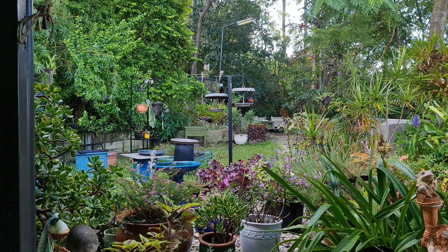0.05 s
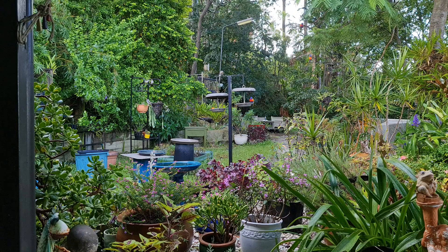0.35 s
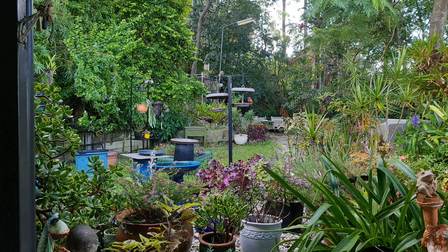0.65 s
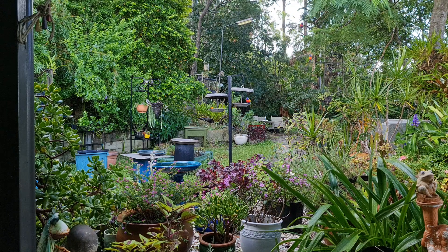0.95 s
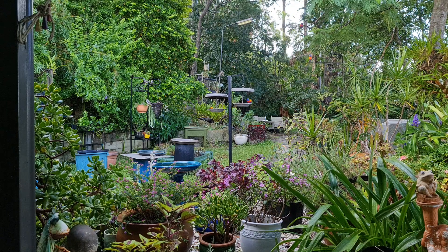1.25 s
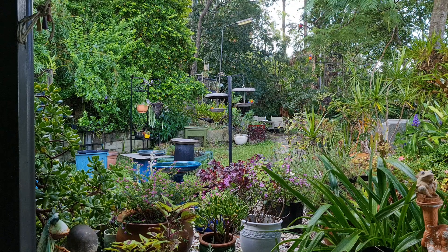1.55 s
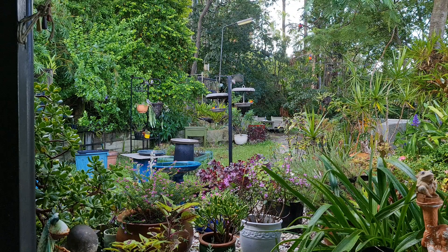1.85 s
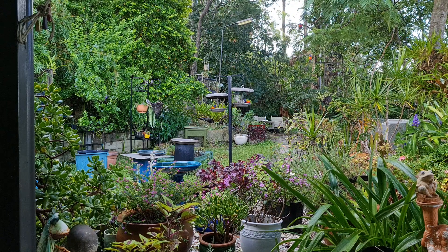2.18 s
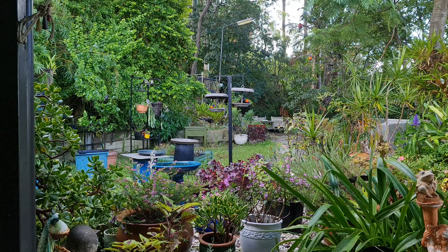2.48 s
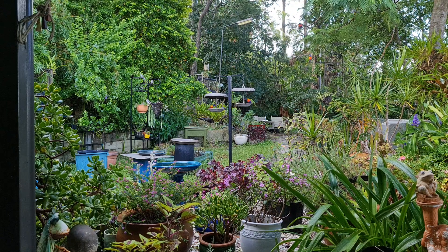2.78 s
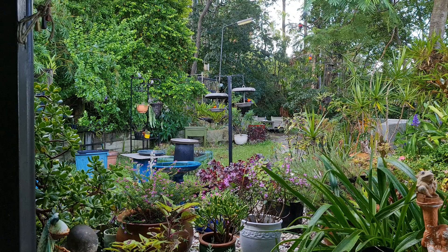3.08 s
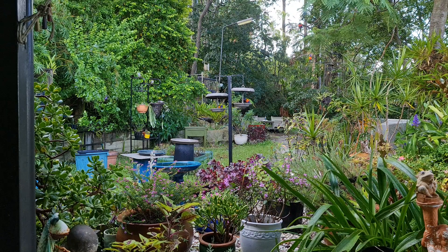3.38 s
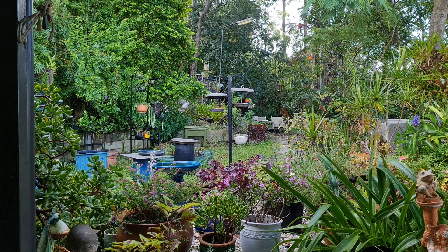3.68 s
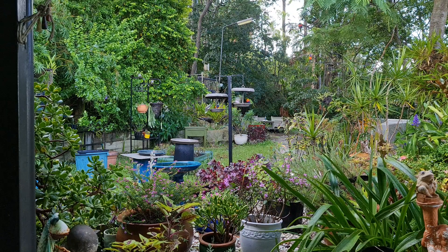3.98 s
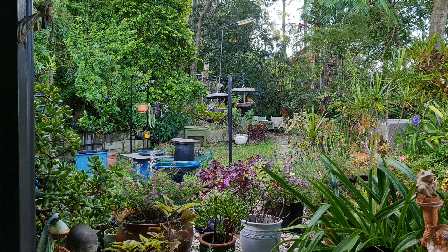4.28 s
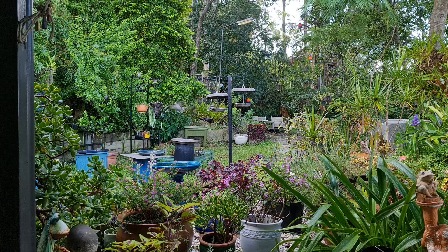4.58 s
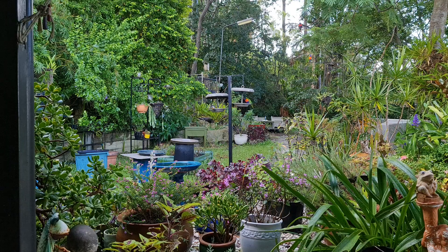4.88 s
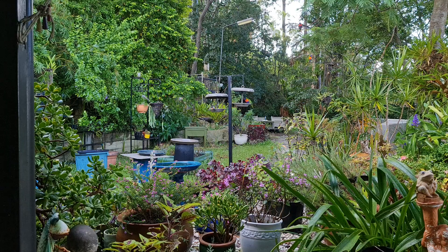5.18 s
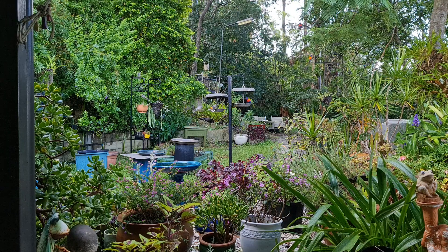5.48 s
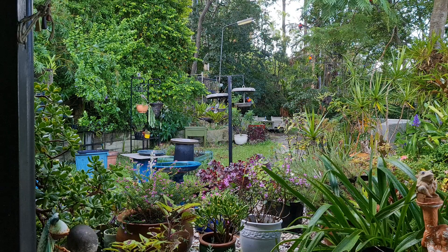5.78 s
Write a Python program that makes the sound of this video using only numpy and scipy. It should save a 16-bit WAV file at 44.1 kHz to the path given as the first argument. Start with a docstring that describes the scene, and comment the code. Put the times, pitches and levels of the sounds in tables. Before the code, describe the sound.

A parrot squawks harshly several times in a leafy garden, among small bird whistles, hoarse chatter and ticking twigs.

```python
"""Slurred whistles and hoarse bird chatter in a leafy back garden, over a low, distant rumble.
A parrot gives five harsh squawks in a row and a last loud one; its voice box flaps unevenly, so it rasps.
Twigs and leaves tick and rustle, something knocks softly, and a far crow caws once with a nasal buzz.
Nearby walls and the trees scatter every call."""
import sys
import numpy as np
from scipy import signal
from scipy.fft import rfft, irfft, next_fast_len
from scipy.io import wavfile

SR = 44100
rng = np.random.default_rng(int(sys.argv[2]) if len(sys.argv) > 2 else 0)


def int16_out(signal):
    """Quantize to a 16-bit WAV file."""
    q = np.round(np.clip(np.atleast_2d(signal).T, -1, 1) * 32767)
    wavfile.write(sys.argv[1], SR, q.astype(np.int16))


N = 266364


def from_db(db):
    """Turn decibels into a factor to multiply by."""
    return 10 ** (np.asarray(db) / 20)


def rms_one(x):
    """Scale a sound so that its average strength (rms) is 1."""
    return x / np.sqrt(np.mean(x ** 2) + 1e-20)


def at_hz(points, hz):
    """Read between the points of a curve, with frequency spaced in octaves."""
    knots, values = np.transpose(points)
    return np.interp(np.log(np.maximum(hz, 1)), np.log(knots), values)


def coloured(x, spectrum):
    """Make some frequencies louder and others softer, as a throat does."""
    size = next_fast_len(2 * len(x))
    gain = from_db(at_hz(spectrum, np.fft.rfftfreq(size, 1 / SR)))
    return irfft(rfft(x, size) * gain, size)[:len(x)]


def filtered(x, kind, hz, order=2):
    """Keep the "low" part, the "high" part or one "band" of a sound."""
    return signal.sosfilt(signal.butter(order, hz, kind, fs=SR, output="sos"), x)


def wander(size, rate_hz):
    """A smooth random wobble, about 1 in size."""
    return rms_one(filtered(rng.standard_normal(SR), "low", rate_hz))[-size:]


def clock(length_s):
    """Time through a sound: t in seconds, and u running from 0 to 1."""
    t = np.arange(int(length_s * SR)) / SR
    return t, t / length_s


def arch(u):
    """0 at both ends of a sound, 1 in its middle."""
    return 1 - (2 * u - 1) ** 2


def glide(u, start_hz, middle_hz, end_hz):
    """A smooth slide through three pitches."""
    return start_hz + (end_hz - start_hz) * u + (middle_hz - (start_hz + end_hz) / 2) * arch(u)


def harmonics(pitch, count):
    """Pure tones at 1, 2, 3... times a moving pitch, one in each row."""
    k = np.arange(1, count + 1)[:, None]
    return np.sqrt(2) * np.sin(2 * np.pi * k * np.cumsum(pitch) / SR) * (k * pitch < SR / 2)


def add(track, start_s, sound, fade_s=0.0017):
    """Lay a sound into a track, fading it in and out."""
    at, i = round(start_s * SR), np.arange(len(sound))
    sound = sound * np.minimum(1, np.minimum(i, i[::-1]) / (fade_s * SR))
    track[at:at + len(sound)] += sound[:N - at]


def air(level_db=-49):
    """A steady distant rumble, alike in both ears, and a hiss that differs between them."""
    # tone colour of the noise: f/Hz, level/dB
    spectrum = [(20, -29), (45, -6), (92, 0.5), (170, -4), (260, -11.5), (400, -13), (750, -15),
                (1500, -19.5), (3000, -19), (6500, -19.5), (9500, -30), (13000, -26.5), (16000, -26.5)]
    # how alike left and right are: f/Hz, likeness (1 = the same)
    likeness = [(30, 1), (120, 0.96), (250, 0.85), (500, 0.54), (1000, 0.011), (16000, 0.036)]
    hz = np.fft.rfftfreq(N, 1 / SR)
    shared, opposite = rfft(rng.standard_normal((2, N))) * from_db(at_hz(spectrum, hz))
    alike = np.clip(at_hz(likeness, hz), 0, 1)
    stereo = np.sqrt(1 + alike) * shared + np.sqrt(1 - alike) * opposite * [[1], [-1]]
    return from_db(level_db) * rms_one(irfft(stereo, N))


def leaves(per_s=30, level_db=-38, spread_db=4, low_hz=7000):
    """Leaves give tiny, high ticks at random moments."""
    hits = rng.random(N) < per_s / SR
    strength = from_db(level_db + spread_db * np.clip(rng.standard_normal(N), -2, 1.6))
    return filtered(hits * strength + 1e-18, "high", low_hz)


def whistles(scoop_s=.013, waver=.0035, accent_width_s=0.02, flutter_db=2.0, flicker_db=5.5):
    """Birds whistle sliding, fluttering notes, each with one louder moment (its accent)."""
    # notes: t/s, length/s, start f/Hz, middle f/Hz, end f/Hz, scoop (share of the pitch it starts below),
    # level/dB, octave above that level/dB, accent time into the note/s, accent/dB
    notes = [ (.118, 0.089, 2283, 2346, 1860, 0.11, -59, -0.5, 0.051, 5.5),
             (1.303, 0.071, 1616, 1404, 1266, 0.01, -56.5, 4, 0.065, 5.6),
             (1.456, .159, 3057, 2605, 2027, 0.02, -46, -13.5, 0.018, 11.4),
             (1.645, .075, 1193, 1260, 1290, 0.19, -66, -1, .035, 2),
             (1.696, .074, 3188, 3197, 3143, .22, -51, 9.5, 0.056, 12.2),
             (1.768, 0.055, 3213, 3350, 3160, 0.015, -45.5, 0, 0.0042, 6.6),
             (5.09, 0.097, 4200, 4150, 4330, 0.022, -68, -17, .05, 5)]
    out = np.zeros(N)
    for start_s, length_s, *path_hz, scoop, level_db, octave_db, accent_s, accent_db in notes:
        t, u = clock(length_s)
        pitch = glide(u, *path_hz) * (1 - scoop * np.exp(-t / scoop_s))
        levels = from_db([0, octave_db, -20, max(octave_db, 0) - 21, -23])
        # only the top three harmonics flicker
        flicker = from_db([flicker_db * (k > 1) * wander(len(t), 100) for k in range(5)])
        pitch *= 1 + waver * wander(len(t), 450)
        tone = levels @ (flicker * harmonics(pitch, count=5))
        push_db = accent_db * np.exp(-((t - accent_s) / accent_width_s) ** 2)
        loudness = from_db(level_db + push_db + flutter_db * wander(len(t), 120))
        add(out, start_s, tone * loudness, fade_s=0.0033)
    return out


def rustles(per_s=2500, spread_db=4, low_hz=5000):
    """Leaves brush together in a dense run of tiny clicks that swells and fades."""
    # brief rustles: t/s, length/s, level/dB
    brushes = [(0.137, 0.074, -54), (1.94, 0.21, -62.5), (3.578, 0.25, -58.5), (4.231, 0.12, -57),
               (5.91, 0.1, -54.5)]
    out = np.zeros(N)
    for start_s, length_s, level_db in brushes:
        t, u = clock(length_s)
        clicks = (rng.random(SR) < per_s / SR) * rng.choice([-1, 1], SR)
        strength = from_db(spread_db * np.clip(rng.standard_normal(SR), -2, 2))
        crackle = rms_one(filtered(clicks * strength + 1e-18, "high", low_hz))
        add(out, start_s, from_db(level_db) * arch(u) * crackle[:len(t)])
    return out


def chatter(jitter=0.0292, jitter_hz=250, octave_db=-14, pitch_lift=.02, swell_db=2):
    """Birds in the trees give shrill notes, made hoarse by a fast shake (jitter) in pitch."""
    # notes: t/s, length/s, start f/Hz, end f/Hz, level/dB, hoarseness (1 = usual)
    notes = [ (.17, .13, 1930, 1620, -65, 1.5), (0.689, .12, 2746, 3256, -58, 1.46),
             (.76, 0.12, 3500, 3500, -50, 1.6), (.72, 0.11, 1573, 1576, -68.5, .6),
             (0.819, .13, 4160, 4170, -57.5, 1.17), (.85, .2, 3210, 3216, -56, 1.83),
             (.87, .22, 6290, 6170, -59, 1.03), (1.089, .21, 4220, 3890, -62.5, 1.2),
             (3.55, 0.13, 2515, 2150, -64, 3.7), (3.562, 0.27, 3450, 3400, -57.5, 4.4),
             (3.65, 0.13, 4630, 4490, -55.5, 1.54), (5.3, 0.21, 2740, 2480, -70, 2.1),
             (5.86, 0.16, 4490, 4650, -59, 1.7), (5.88, 0.14, 3016, 3150, -58.5, 1.38)]
    out = np.zeros(N)
    for start_s, length_s, start_hz, end_hz, level_db, hoarse in notes:
        t, u = clock(length_s)
        pitch = (start_hz + (end_hz - start_hz) * u) * (1 + pitch_lift * arch(u))
        pitch *= 1 + hoarse * jitter * wander(len(t), jitter_hz)
        first, octave = harmonics(pitch, count=2)
        loudness = from_db(level_db - swell_db * (2 - arch(u)))
        add(out, start_s, loudness * (first + from_db(octave_db) * octave), fade_s=0.0066)
    return out


def twigs(crack_decay_s=0.007, rustle_decay_s=0.083, rustle_db=-8, octaves=0.36):
    """Twigs and leaves snap: a bright crack, then a short rustle around its own pitch."""
    # snaps: t/s, level/dB, centre of the rustle f/Hz, crack above that level/dB
    snaps = [(.3263, -44, 6600, 4), (0.433, -47, 5100, 3), (0.7587, -39.5, 4100, 8.5), (.857, -43, 3080, 7),
             (0.9875, -48, 3330, 13.5), (1.082, -47.5, 3180, 8.5), (1.1684, -42.5, 3370, -1),
             (1.338, -40.5, 2690, 1), (1.9019, -38.5, 11500, 13), (2.0644, -34, 3600, -2),
             (2.2002, -37.5, 4070, -2.5), (3.2214, -36.5, 4430, 0.5), (3.5473, -36.5, 14000, -3),
             (4.4987, -40.5, 8400, 0), (4.6413, -36.5, 4120, -5), (4.698, -40, 13100, 4),
             (5.0933, -39.5, 14200, -0.5), (5.1667, -38.5, 6900, -1), (5.5737, -31, 5650, -8),
             (5.7214, -37, 3200, 1), (5.831, -41, 5100, -0.5)]
    out, t = np.zeros(N), np.arange(SR // 4) / SR
    for start_s, level_db, hz, crack_db in snaps:
        crack, rustle = rng.standard_normal((2, len(t)))
        edges_hz = np.clip([hz / 2 ** octaves, hz * 2 ** octaves], 100, SR / 2 - 1000)
        rustle = rms_one(filtered(rustle, "band", edges_hz))
        rustle *= from_db(rustle_db - 60 * t / rustle_decay_s)
        crack = rms_one(filtered(crack, "high", 6000))
        crack *= from_db(crack_db - 60 * t / crack_decay_s)
        add(out, start_s, from_db(level_db) * (crack + rustle), fade_s=0.00015)
    return out


def parrot(jitter=0.0208, jitter_hz=400, rasp_hz=112, rasp_spread=0.1657, rasp_db=3.0, rasp_bend=0.065,
           end_effort=0.29, pitch_sag=0.0407, attack_db=8.5, attack_s=0.009, scoop_s=0.022,
           harsh_s=0.015, hiss=0.13, smooth_third_db=18, low_follows=0.39):
    """The voice box flaps unevenly: each flap swells and bends the tone, making it a harsh squawk."""
    # squawks: t/s, length/s, top f/Hz, scoop (share of the pitch it starts below), upper tones level/dB,
    # first tone and octave above that level (each /dB), roughness (1 = full rasp), swell/dB,
    # crest (moment of most effort, as a share of the length)
    squawks = [ (1.905, 0.16, 1408, .09, -52.5, 0, 4.5, 2.2, -6, 0.63),
               (2.270, .150, 1445, .12, -27, -20, -12, 1.45, 11, 0.67),
               (2.519, 0.13, 1500, 0.1, -24.5, -21.5, -12, 1.13, 4.5, 0.69),
               (2.745, .150, 1429, .13, -23.5, -20.5, -13.5, 1.15, 5.5, 0.53),
               (2.990, .152, 1406, 0.1, -24, -21.5, -15, 1.04, 10, 0.67),
               (3.240, .160, 1408, .15, -27.5, -19.5, -11, 1.39, 5.5, 0.534),
               (3.792, 0.19, 1321, 0.0069, -41.5, -10.5, -8.5, 0.71, -1, 0.442),
               (4.043, .147, 1436, 0.048, -20.5, -18.5, -19.5, 0.95, 6, 0.803)]
    # how the throat and open bill colour the voice: f/Hz, level/dB
    throat = [(1000, -20), (2400, 0.5), (3450, -5), (3900, -2.5), (4500, 4), (4850, -2), (5300, 0.5),
              (5750, -9), (6400, -3.5), (6900, -14), (7400, -17), (10000, -19), (13000, -17.5),
              (16000, -35.5)]
    out = np.zeros(N)
    for start_s, length_s, top_hz, scoop, level_db, first_db, octave_db, rough, swell_db, crest in squawks:
        t, u = clock(length_s)
        size = len(t)
        # effort rises to the crest and eases off; slack is how far it falls short
        before = (1 - u / crest) ** 2
        after = (1 - end_effort) * ((u - crest) / (1 - crest)) ** 2
        slack = np.where(u < crest, before, after)
        drop_db = swell_db * slack + attack_db * np.exp(-(t / attack_s) ** 2)
        # a call slides up from a clean start and breaks into a rasp as pressure builds
        pitch = top_hz * (1 - pitch_sag * slack) * (1 - scoop * np.exp(-t / scoop_s))
        harsh = rough * (1 - np.exp(-t / harsh_s))
        flap = 2 * np.pi * np.cumsum(rasp_hz * (1 + rasp_spread * wander(size, 77.5))) / SR
        # each flap is loudest while its pitch sweeps down
        bend = jitter * wander(size, jitter_hz) + rasp_bend * np.cos(flap)
        tones = harmonics(pitch * (1 + harsh * bend), count=12)
        pulse = rms_one(from_db(rasp_db * harsh * np.sin(flap)))
        # a smooth call has a stronger third harmonic
        tones[2] *= from_db(smooth_third_db * max(0, 1 - rough))
        # the upper tones and a little breath ring in the throat
        breath = hiss * harsh * rng.standard_normal(SR)[:size]
        upper = rms_one(coloured(pulse * (rms_one(tones[2:].sum(0)) + breath), throat))
        # the two low tones skip the throat curve and follow only part of the level change
        lower = pulse * (from_db(first_db) * tones[0] + from_db(octave_db) * tones[1])
        lower = filtered(lower, "low", 3100, order=8)
        call = from_db(level_db - drop_db) * upper + from_db(level_db - low_follows * drop_db) * lower
        add(out, start_s, call, fade_s=0.00089)
    return out


def thud(start_s=2.535, length_s=.06, hz=250, level_db=-51):
    """A soft knock somewhere in the garden: a short burst of low noise."""
    out = np.zeros(N)
    body = filtered(rng.standard_normal(SR), "band", [hz / 1.2, hz * 1.24])
    add(out, start_s, from_db(level_db) * rms_one(body[-int(length_s * SR):]), fade_s=0.0074)
    return out


def crow(start_s=4.8, length_s=.308, end_db=-49.5, rise_db=4, jitter=0.007):
    """One far caw: a low buzz through a nasal throat, arching in pitch and growing louder."""
    # pitch of the caw: start f/Hz, middle f/Hz, end f/Hz
    path_hz = (213.7, 250, 225.8)
    # how the throat colours the buzz: f/Hz, level/dB
    throat = [(950, -17), (1220, -8.5), (1480, 2), (1750, -10), (2000, -0.5), (2300, -12), (2700, -41),
              (5000, -40)]
    out = np.zeros(N)
    t, u = clock(length_s)
    pitch = glide(u, *path_hz) * (1 + jitter * wander(len(t), 120))
    buzz = harmonics(pitch, count=16).sum(0)
    loudness = from_db(end_db - rise_db * (1 - u))
    add(out, start_s, loudness * rms_one(coloured(buzz, throat)), fade_s=0.014)
    return out


def garden(x, direct_db, walls_db, trees_db, lag_ms, pan_db=0, walls_decay_s=0.26, trees_decay_s=0.62):
    """Sound arrives directly, as quick echoes off nearby walls and as a long, duller tail off trees."""
    t = np.arange(SR) / SR
    walls, trees = rng.standard_normal((2, 2, SR)) * (1 - np.exp(-t / 0.00051))
    walls = rms_one(walls * from_db(-60 * t / walls_decay_s))
    trees = rms_one(filtered(trees, "low", 6500) * from_db(-60 * t / trees_decay_s))
    size = next_fast_len(N + SR)
    echoes = rfft(from_db(walls_db) * walls + from_db(trees_db) * trees, size) / np.sqrt(SR)
    # above zero, lag_ms makes the left ear later and pan_db makes it louder
    ears = np.array([[1], [-1]]) / 2
    delay = np.exp(-2j * np.pi * np.fft.rfftfreq(size, 1 / SR) * ears * lag_ms / 1000)
    paths = from_db(direct_db) * delay + echoes
    return from_db(pan_db * ears) * irfft(rfft(x, size) * paths, size)[:, :N]


def scene():
    """Place the birds and foliage around the garden, then add the knock and the air."""
    return (garden(parrot(), direct_db=-6.5, walls_db=0.5, trees_db=-14.5, lag_ms=-0.017)
            + garden(whistles(), direct_db=3.5, walls_db=1.0, trees_db=-7.0, lag_ms=0.13)
            + garden(chatter(), direct_db=5.0, walls_db=5.5, trees_db=4, lag_ms=-0.21, pan_db=-0.5)
            + garden(crow(), direct_db=1.0, walls_db=0, trees_db=-11.5, lag_ms=0.16)
            + garden(twigs() + leaves() + rustles(),
                     direct_db=1.5, walls_db=6.5, trees_db=-28.5, lag_ms=-0.487, pan_db=3.5)
            + thud() + air())


def record(dry, cutoff_hz=16300):
    """The two microphones colour the sound differently, and the highest treble is cut."""
    # balance of the microphones: f/Hz, left minus right level/dB
    balance = [(100, -1.6), (1100, -2), (1500, -0.5), (2800, -1.2), (4400, -2), (6300, -4), (8200, 7),
               (9600, -2), (16000, -0.5)]
    hz = np.fft.rfftfreq(N, 1 / SR)
    gains = from_db(at_hz(balance, hz) * np.array([[1], [-1]]) / 2)
    heard = irfft(rfft(dry) * gains, N)
    return signal.sosfilt(signal.ellip(10, .1, 80, cutoff_hz, fs=SR, output="sos"), heard)


dry = scene()
out = record(dry)
int16_out(out)
```